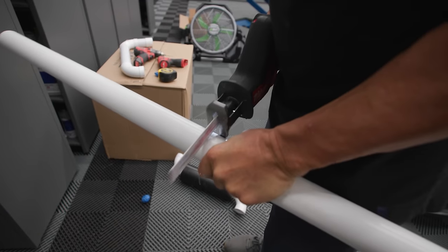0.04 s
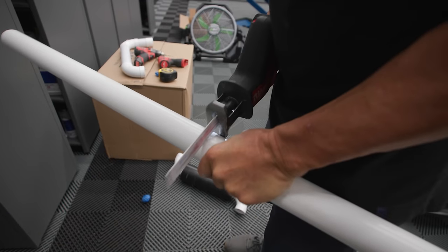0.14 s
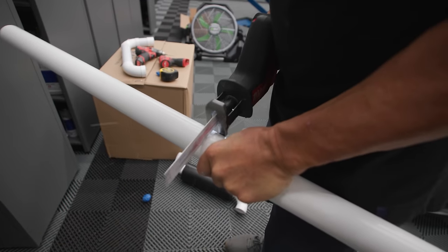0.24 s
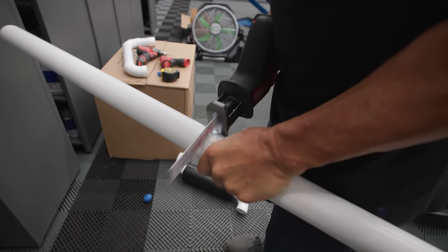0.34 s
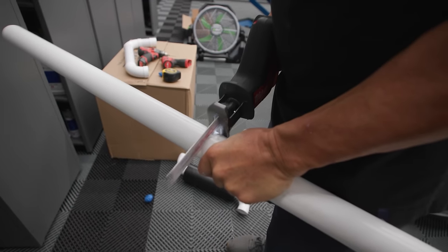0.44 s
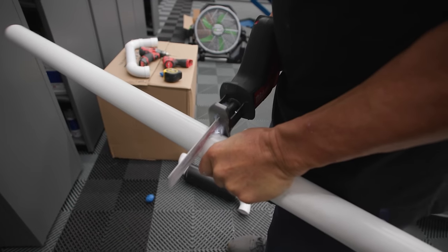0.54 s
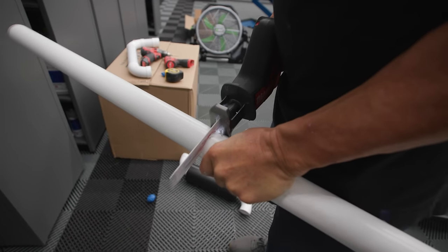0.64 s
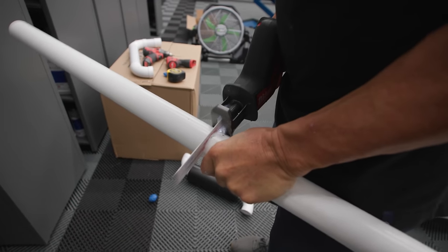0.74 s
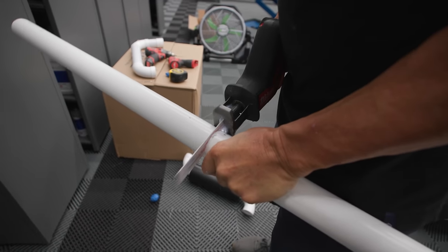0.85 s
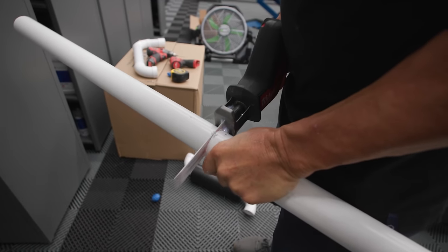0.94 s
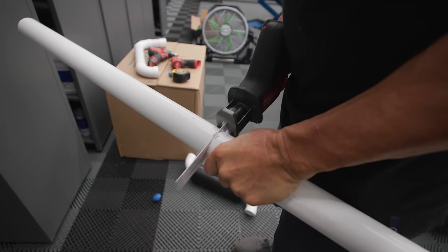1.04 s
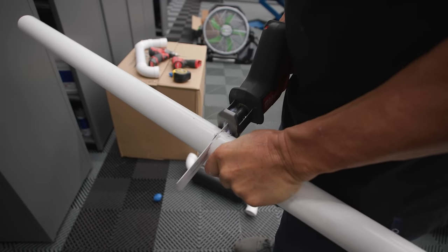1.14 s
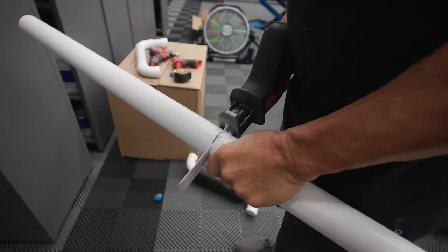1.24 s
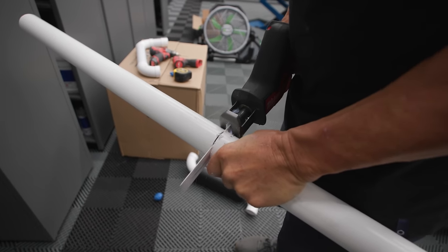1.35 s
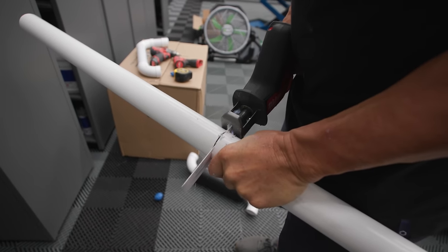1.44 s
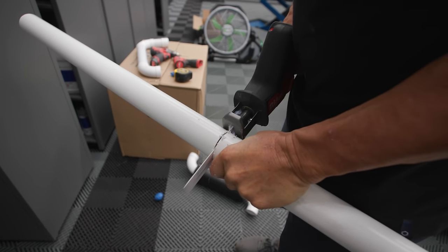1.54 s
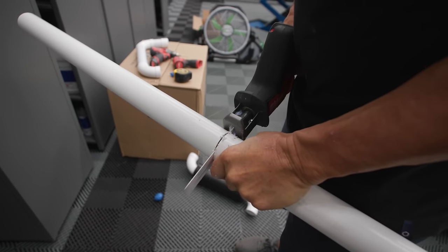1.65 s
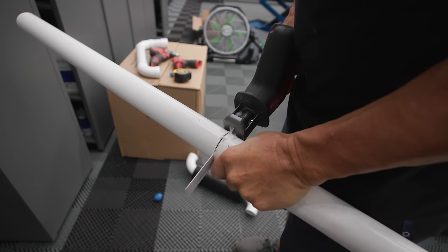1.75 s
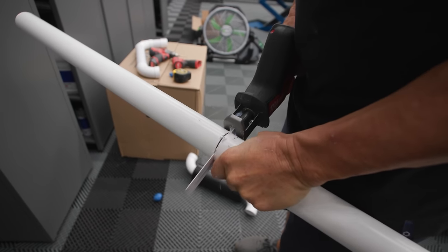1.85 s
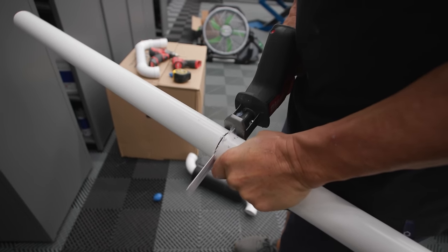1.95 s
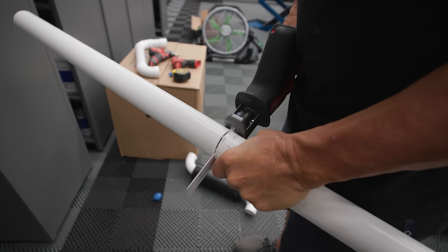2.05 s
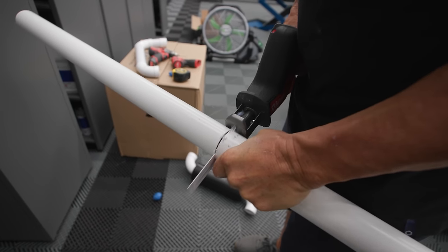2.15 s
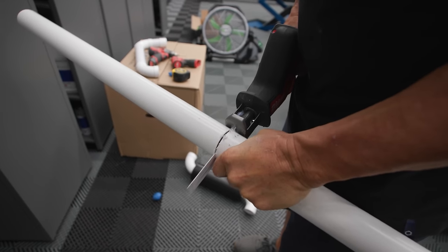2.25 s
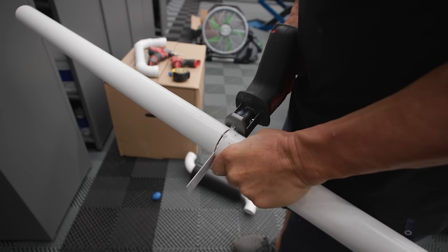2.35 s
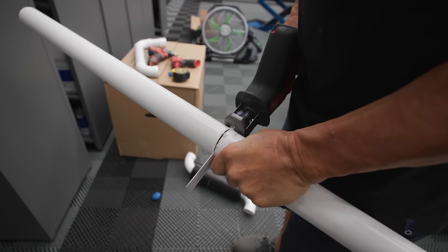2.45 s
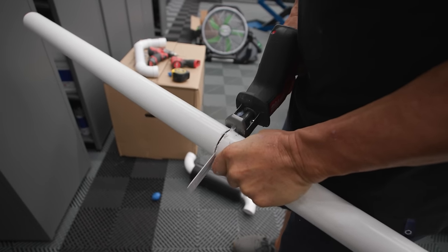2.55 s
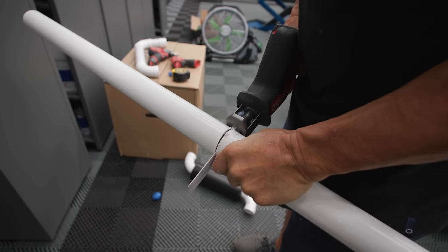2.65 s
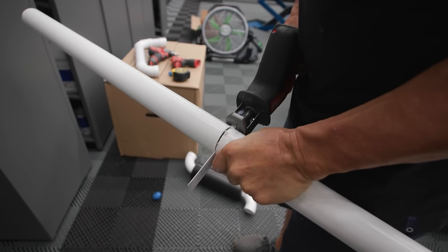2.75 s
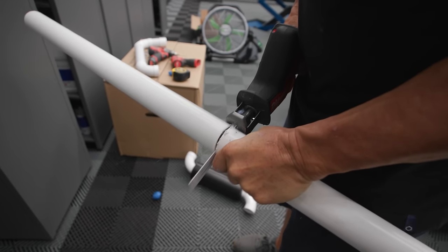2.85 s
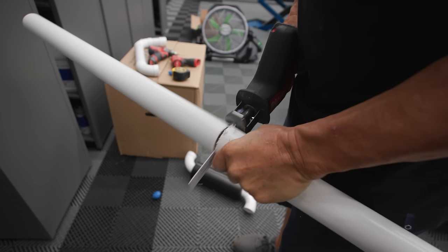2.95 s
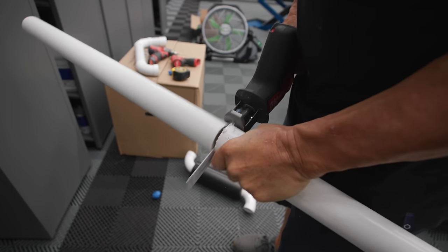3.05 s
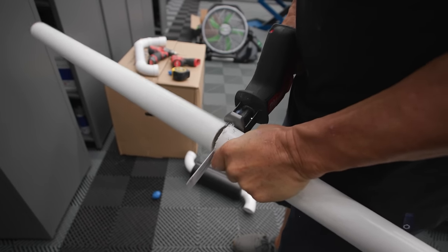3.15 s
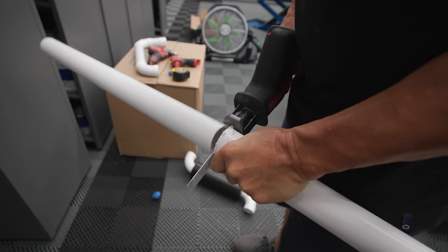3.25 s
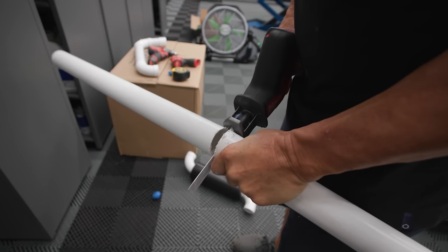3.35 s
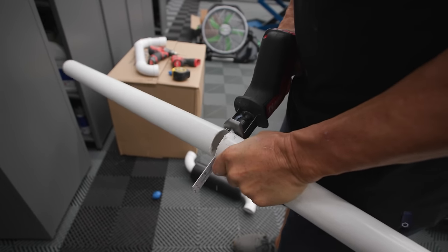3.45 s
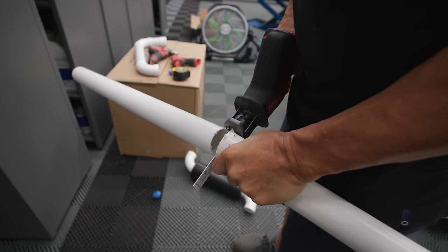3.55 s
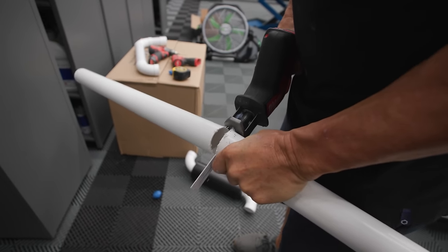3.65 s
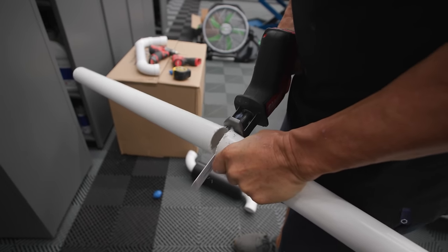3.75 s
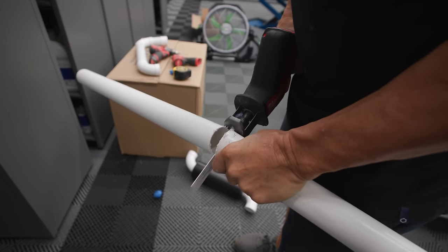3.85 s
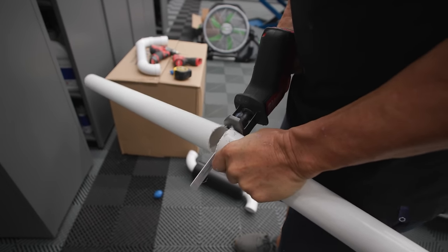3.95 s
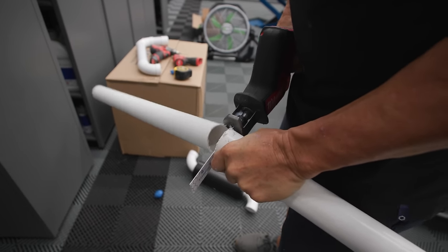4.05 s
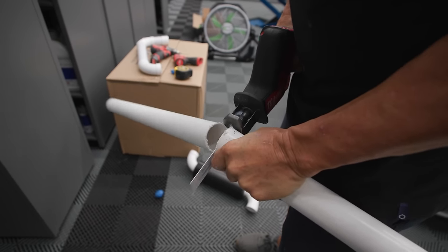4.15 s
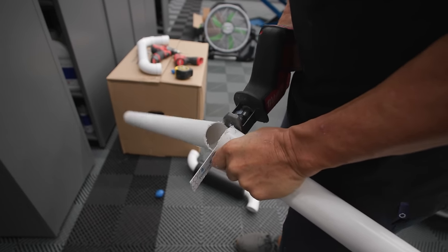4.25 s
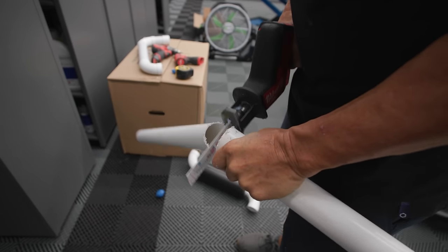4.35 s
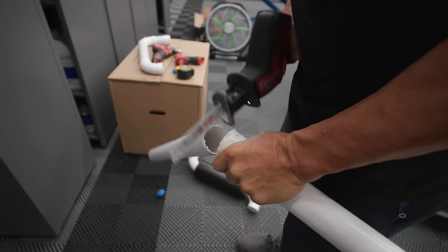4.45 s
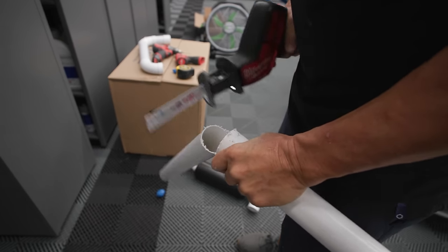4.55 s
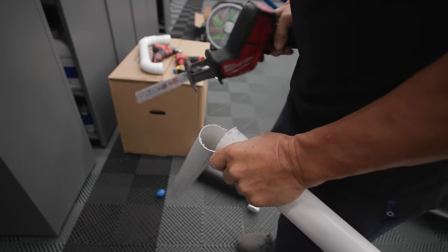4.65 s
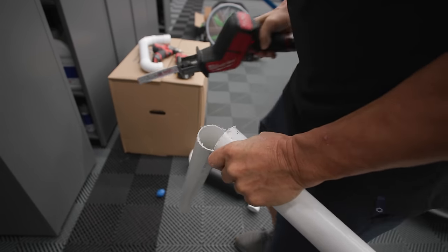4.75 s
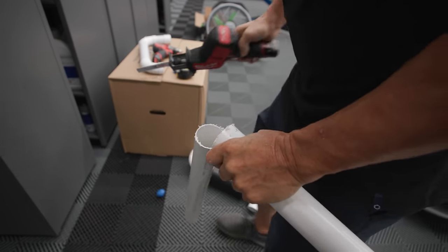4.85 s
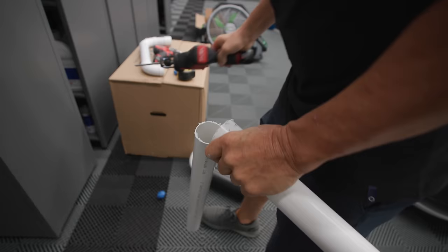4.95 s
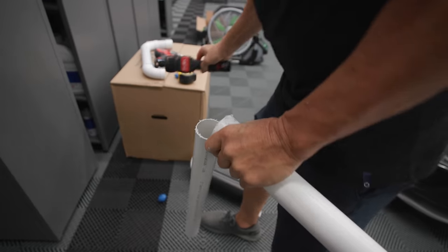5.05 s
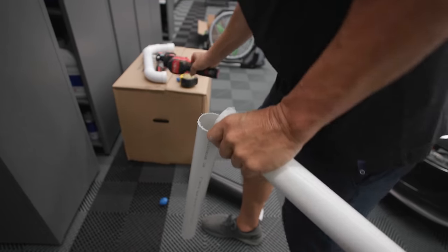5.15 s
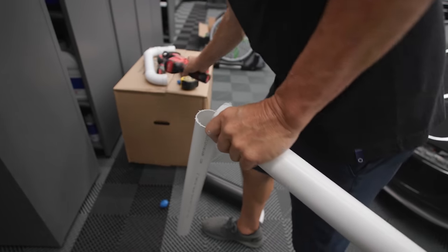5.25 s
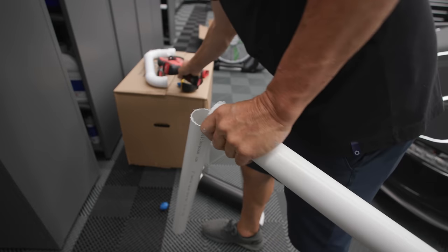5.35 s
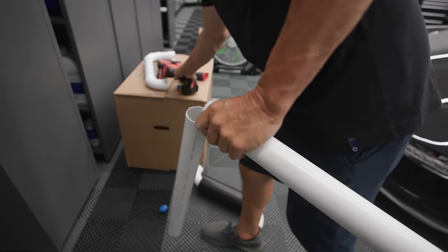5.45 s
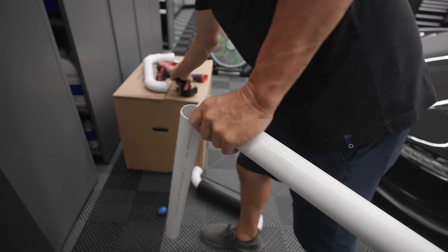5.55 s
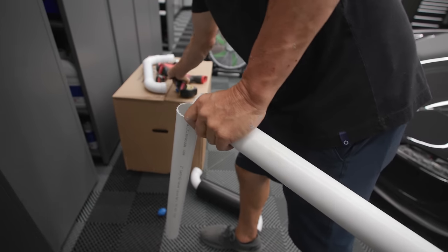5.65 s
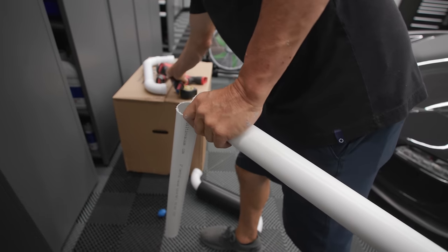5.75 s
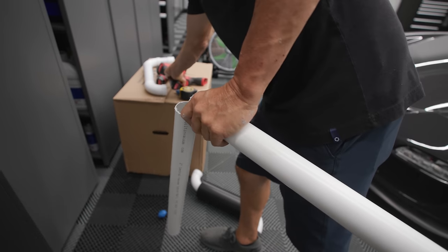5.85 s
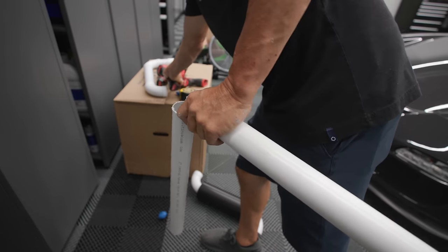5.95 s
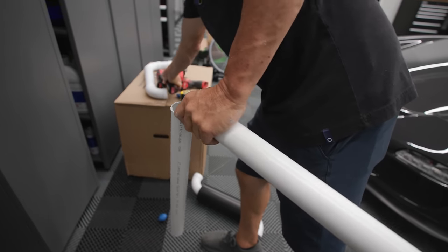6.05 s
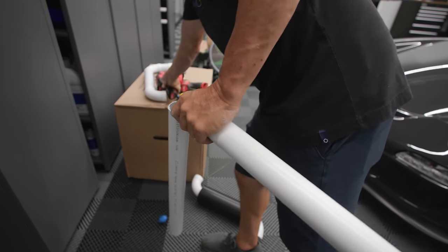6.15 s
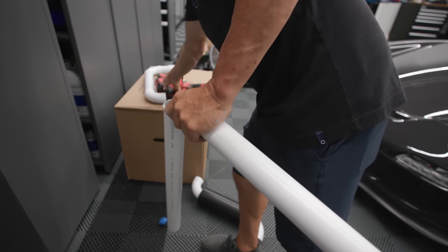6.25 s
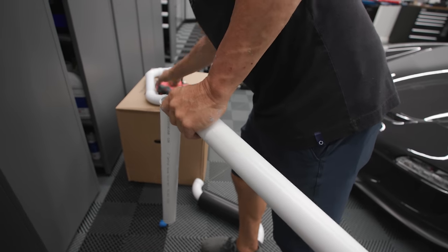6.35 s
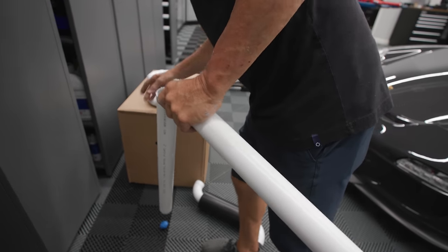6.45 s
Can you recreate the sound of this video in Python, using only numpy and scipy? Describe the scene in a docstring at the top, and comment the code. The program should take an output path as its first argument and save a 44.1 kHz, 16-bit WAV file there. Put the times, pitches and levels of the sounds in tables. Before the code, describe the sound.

Harsh buzzing saw strokes chew through a plastic pipe, stutter three times and stop; cloth rustles and the tool thumps hollowly onto cardboard.

```python
"""A cordless reciprocating saw cuts a plastic pipe in a garage: one long cut, then three short bursts.
Noise stands for the scraping teeth; a force curve repeated at each stroke shapes it, and filters colour it.
Damped sinusoids at each stroke are pipe wall, blade squeak and brief whine; crank harmonics shake the tool.
Then the cut-off pipe end knocks on the floor, clothes rustle (filtered noise) and the saw is set down on a
cardboard box: modal thuds with noise clacks and ticks. A diffuse tail and quiet coloured air surround it."""
import sys
import numpy as np
from scipy import signal
from scipy.fft import rfft, irfft
from scipy.io import wavfile
from scipy.ndimage import uniform_filter1d

SR = 44100
rng = np.random.default_rng(int(sys.argv[2]) if len(sys.argv) > 2 else 0)


def transcribe(u):
    """Save the signal u as a 16-bit wav file named by the first command-line argument.

    u: samples, shape (n,) or (channels, n), limited to [-1, 1]; the rate is SR.
    q: integer samples, one column per channel.
    """
    v = np.clip(np.atleast_2d(u).T, -1, 1)
    q = np.round(v * 32767).astype(np.int16)
    wavfile.write(sys.argv[1], SR, q)


N = 286209
T = np.arange(N) / SR  # time axis, s

# Colour of the quiet air: [f/Hz, relative density/dB per Hz]
AIR_SPECTRUM = [(15, -11), (25, -15), (38, -1), (60, -16), (88, -3.5), (200, -16), (290, -17.5), (400, -13),
                (750, -16), (1200, -22), (3300, -25), (4000, -19.5), (4700, -29.5), (15500, -40.5)]
AIR_DB = -53
# Decay of the garage's diffuse tail: [f/Hz, t60/s]
GARAGE_DECAY = [(100, 1), (500, 0.36), (2000, 0.82), (4000, 0.53), (8000, 0.59), (14000, 0.37)]
SAW_TO_GARAGE_DB, KNOCKS_TO_GARAGE_DB = -10.0, -9.5

# Colour of rubbing cloth: [f/Hz, relative density/dB per Hz]
CLOTH_SPECTRUM = [(150, 1.5), (320, 0.5), (550, 3), (950, -3.5), (1500, -5), (2300, -6.5), (2900, -11.5),
                  (4800, -11), (6000, -15.5), (8500, -19), (10500, -18.5), (13000, -24), (15000, -29)]
# Body movements that rustle the clothes: [start t/s, length/s, level/dB]
RUSTLES = [(5.02, 0.39, -51), (5.34, 0.24, -48), (5.6, 0.97, -54.5), (6.2, 0.77, -51)]

# Knocks of pipe and saw: [t/s, thud level/dB, thud pitch (factor on the box),
# thud length (factor on the box), clack level/dB, tick level/dB]
KNOCKS = [(4.777, -42, 0.7, 1, -55, -53), (5.014, -52, 0.77, 1, -36.5, -58), (5.02, -56, 1, 1, -41, -59),
          (5.612, -32, 0.6, 1, -44, -60), (5.6194, -40, 1.04, 1, -42, -28.5),
          (5.623, -24, 0.67, 1.04, -50, -50), (5.927, -29, 0.88, 0.93, -50, -50),
          (5.946, -27, 0.75, 1, -54, -51), (6.1885, -12, 1.0, 1.12, -15.5, -21),
          (6.1906, -34, 1.4, .7, -22.5, -25), (6.213, -26, 1.1, 1, -38, -44),
          (6.2205, -37, 1.7, 1, -42, -38), (6.243, -30, 1.2, 1, -43, -47),
          (6.3284, -14.5, 0.955, 0.53, -34.5, -54), (6.345, -36, 1.2, .7, -38, -52),
          (6.386, -25, 1.1, 1.05, -35.5, -35), (6.402, -33, 1.1, .7, -43, -45)]
# Modes of the cardboard box at pitch and length 1: [f/Hz, level/dB, t60/s]
BOX_MODES = [(92, -36, .1), (150, 2.5, 0.086), (170, -9, 0.037), (255, -3, 0.048), (453, -21, 0.2),
             (570, -13.5, 0.054)]
# Colours of the hard contact, clack and tick: [f/Hz, relative density/dB per Hz]
CLACK_SPECTRUM = [(40, -22), (150, -8), (400, -6), (700, 0.5), (980, 0.5), (1250, -5), (2000, -8.5),
                  (3000, -14), (3900, -30), (4800, -13), (6500, -23.5), (14000, -36)]
TICK_SPECTRUM = [(60, -20), (500, -2), (2000, -7.5), (3100, 4), (4500, -0.5), (6500, -13.5), (8400, -26),
                 (11000, -23), (15000, -26)]
# Modes of the cut-off pipe end, which knocks once on the floor: [f/Hz, level/dB, t60/s]
PIPE_END_MODES = [(576, 0, 0.14), (670, -7, .12), (853, -7, .16), (1023, 0, .15), (1140, -2, .1),
                  (1529, -9, .05)]
PIPE_DROP_S, PIPE_DROP_DB = 5.0145, -46
# Modes of a small metal clink as the saw settles: [f/Hz, level/dB, t60/s]
CLINK_MODES = [(2780, 0, 0.025), (3240, -2, .025), (3350, -3, .03), (8200, -6, .018), (8550, -10, .015)]
CLINK_S, CLINK_DB = 6.3858, -31.5
# The box drums as the saw slides on it: [start t/s, length/s, level/dB]
SLIDES = [(5.68, 0.097, -47.5), (6.2, 0.14, -47), (6.36, 0.25, -41)]

# Trigger pulls that finish the cut: [start t/s, stop t/s, rasp level/dB]
BURSTS = [(3.71, 3.898, -24), (3.966, 4.15, -24.5), (4.213, 4.365, -29)]
CUT_STOP_S = 3.535
SPIN_UP_S, BRAKE_S = 0.044, 0.012  # time constants of the level's rise and fall

# Colour of the pipe shaken in the hand: [f/Hz, relative density/dB per Hz]
JUDDER_SPECTRUM = [(25, -32), (55, -8), (85, -3), (120, -1.5), (170, -8.5), (280, -3.5), (350, -1.5),
                   (450, -4), (900, -52)]
# Pipe rumble during the long cut: [t/s, level/dB]
RUMBLE = [(0, -43), (.09, -39), (.2, -50), (.7, -60), (1.2, -81), (2.2, -60), (2.82, -50.5), (2.97, -39.5),
          (3.2, -44), (3.55, -53)]
BURST_JUDDER_DB = -21  # over the rasp of a burst

# Crank speed: [t/s, stroke rate/Hz]
SPEED = [(0.0, 36.66), (0.3, 37.0), (0.5, 37.85), (0.65, 38.06), (0.85, 37.61), (1.1, 38.84), (1.4, 39.21),
         (1.75, 40.36), (2.05, 39.46), (2.35, 39.45), (2.6, 41.2), (2.9, 39.95), (3.2, 38.42), (3.55, 39.7)]
# Shaking of the tool: [t/s, mean level/dB at 1, 2, 3, 4 and 5 times the stroke rate]
SHAKE = [(0.0, -55, -50, -56, -54, -46), (0.18, -60, -53, -38, -46, -42), (0.4, -64, -53, -42.5, -49, -45),
         (0.62, -67, -60, -49, -52, -48), (0.95, -65, -67, -52, -55, -61), (1.25, -59, -60, -53, -57, -59),
         (1.45, -55, -53, -51, -68, -59), (1.7, -55, -57, -51, -66, -61), (1.87, -62, -62, -44.5, -61, -63),
         (2.15, -69, -52, -49, -60, -54), (2.4, -51, -52, -47, -53, -61), (2.75, -46, -47, -44.5, -56, -60),
         (3.05, -46, -50, -48, -56, -49), (3.25, -48, -48, -44.5, -56, -62),
         (3.55, -55, -55, -56, -58, -62)]
# Higher harmonics of the crank: [multiple of the stroke rate, mean level/dB]
OVERTONES = [(6, -62), (7, -59), (8, -69)]
# motor whine and speed control's singing at each restart: level, time to peak
WHINE_DB, WHINE_S, SING_DB, SING_S = -34, .045, -52, .055

# Ringing at each stroke: pipe wall resonances, a blade squeak near 1650 Hz on the return stroke and a
# brief motor whine at 3780 Hz: [start t/s, end t/s, f/Hz at start, f/Hz at end,
# onset (share of the stroke), time to peak/s, level/dB against the rasp]
STROKE_RINGS = [(0.04, 0.52, 1655, 1630, .26, .0042, -5), (0.92, 1.4, 2030, 2005, .68, .005, -8),
                (0.9, 1.95, 1190, 1195, .66, .005, -13.5), (1.8, 2.3, 1205, 1195, .66, .005, -8.5),
                (2.25, 2.72, 1205, 1200, .66, .006, -9.5), (0.6, 1.7, 2460, 2420, .68, .0036, -8.5),
                (0.95, 1.52, 3540, 3560, .66, .003, -6.5), (1.5, 2.0, 3500, 3580, .65, .003, -8),
                (0.8, 2.0, 5420, 5270, .72, .003, -13), (0.47, 1.9, 4820, 4800, .66, .0024, -11.5),
                (0.25, 0.79, 860, 1040, .62, .005, -10.5), (0.1, 0.86, 505, 550, .7, .005, -14),
                (0.08, 0.5, 3080, 3100, .76, .003, -11), (0.0, 0.15, 3780, 3780, .3, .005, -8),
                (0.2, 0.75, 1980, 1750, .45, .004, -11), (1.9, 2.32, 2040, 1980, .68, .0035, -11),
                (1.75, 2.32, 2400, 2480, .68, .003, -10), (2.3, 3.3, 2380, 2300, .05, .004, -11.5),
                (0.75, 1.85, 925, 915, .75, .006, -20), (2.0, 3.55, 5200, 5180, .6, .0015, -15.5),
                (2.4, 3.2, 2950, 2850, .6, .003, -14), (2.4, 3.6, 480, 470, .55, .01, -17.5),
                (3.5, 4.4, 1530, 1600, .5, .0022, -9), (3.34, 4.4, 2820, 2880, .5, .0035, -9.5)]
RING_UNEVEN_DB, RING_DETUNE = 1.6, .008  # stroke-to-stroke spread of level and of pitch (share)
RING_JITTER_S, LOOSE_JITTER_S = .00013, .001  # spread of ring timing, pipe firm and loose

# Force on the teeth through one stroke, before the bite factor: [share of the stroke, level/dB]
STROKE = [(0, -1), (.1, .5), (.22, -2.5), (.42, -4.5), (.58, -8), (.66, 1.5), (.76, 5.5), (.88, 2.5)]
# How deeply the teeth bite: [t/s, factor on the stroke's dB shape]
BITE = [(.1, .5), (.42, .35), (.85, 1.1), (1.4, 1.05), (2.25, 0.65), (2.4, 0.1), (2.85, 0.16), (3.1, 0.55),
        (3.7, 0.3)]
CHATTER_DB, CHATTER_DB_PER_BITE = 2.5, -1.5  # a shallow bite lets the teeth skip
STROKE_UNEVEN_DB = .5  # spread of force between strokes
# until the teeth have made a groove they catch later (share of a stroke) and jolt harder (force factors)
GROOVE_S, GROOVE_TAKES_S = 0.49, 0.18
ENTRY_LAG, ENTRY_JOLT, JOLT = .14, 1.1, 0.25

# Long cut: [t/s, rasp level/dB, pipe body level/dB over the rasp, tooth fizz level/dB over the rasp]
CUT = [(0.0, -24, -4.5, -10), (0.09, -22.5, -7.5, -8), (0.66, -21.5, -7, -12), (0.96, -23, -11.5, -7),
       (1.29, -23, -14.5, -8), (1.71, -23.5, -8, -10.5), (1.83, -20, -13, -9), (1.9, -25, -13, -8.5),
       (2.0, -26.5, -9, -8), (2.78, -23.5, -6.5, -10.5), (2.91, -26, -3, -6.5), (3.0, -22, -4.5, -10),
       (3.28, -22.5, -7, -11.5), (3.3, -24.5, -2.5, -9.5), (3.52, -24.5, -6.5, -9.5),
       (3.53, -22.5, -4.5, -11.5)]
BURST_BODY_DB, BURST_FIZZ_DB = -6.5, -12  # over the rasp
# Colours of the cut, hollow body, rasp and fizz: [f/Hz, relative density/dB per Hz]
BODY_SPECTRUM = [(60, -35), (130, -19.5), (230, -20), (340, -14), (410, -7.5), (500, -0.5), (640, -0.5),
                 (800, -1), (920, -1), (1050, -4), (1200, -0.5), (1380, -4.5), (1600, -4.5), (2200, -49)]
RASP_SPECTRUM = [(800, -39.5), (1250, -9), (1520, -3), (2000, -0.5), (2400, -1.5), (3100, -1), (3550, -0.5),
                 (4000, -3), (4400, -5.5), (4750, -5.5), (5250, -3.5), (5600, -12.5), (6200, -18.5),
                 (8000, -58)]
FIZZ_SPECTRUM = [(4500, -29), (5900, 1.5), (6500, -0.5), (7200, 0.5), (8500, -1), (10000, -4),
                 (11500, -8.5), (13600, -14), (14400, -17), (15000, -88)]
# Gain of the highest treble in the fizz: [t/s, level/dB]
FIZZ_TOP = [(0.1, -5.5), (0.75, -4.5), (1.2, 0.5), (2.2, -0.5), (2.55, 6), (3.0, 1), (3.8, 3.5)]
FIZZ_TOP_HZ = 9400
FIZZ_POWER, BODY_POWER = 0.87, 0.67  # exponents on the force
# Teeth snag on the slot's edge: [t/s, level/dB]
SNAGS = [(0.075, -12), (0.187, -17), (0.634, -18), (0.74, -13), (.847, -15), (0.927, -15), (1.058, -18),
         (1.16, -15), (1.417, -24), (1.441, -19), (1.844, -20), (2.145, -17), (3.544, -16), (3.815, -13),
         (3.946, -30), (4.06, -19), (4.087, -15), (4.362, -24)]
SNAG_FIZZ_DB = -8  # over the snag's rasp
CHIPS_PER_S, CHIP_SHARE = 260, .15  # mean rate; share of the noise power that drives rasp and fizz
# repeating share of the scrape's power, pipe firm; its likeness from one stroke to the next (0-1)
RASP_REGULAR, BODY_REGULAR, LIKENESS = .45, .56, .75
LOOSE_S, LOOSE_TAKES_S = 2.5, .6  # the pipe shifts about and the strokes stop repeating
# Relative modes of the free steel blade: [f/Hz, level/dB, t60/s]
BLADE_MODES = [(2790, -6, .4), (3660, -4, .4), (3712, -2, .6), (3774, 1, .85), (3815, -2, .85),
               (3870, -5, .7)]
BLADE_HELD_DB, BLADE_FREE_DB = -23, -17  # against the rasp, held in the slot and free
GAPE_S, GAPE_TAKES_S = 3.3, 0.26  # the slot gapes and the blade rings freely

CEILING, EDGE_HZ = .45, 15600  # peak amplitude and band edge of the output


def amp(db):
    """Level definition: decibels to amplitude ratio."""
    return 10 ** (np.asarray(db) / 20)


def unit(x):
    """Normalisation to rms 1."""
    return x / np.sqrt(np.mean(x ** 2) + 1e-20)


def noise():
    """White noise: equal mean power in every band."""
    return rng.standard_normal(N)


def curves(rows):
    """Linear interpolation of each column against time."""
    s, *columns = np.transpose(rows)
    return [np.interp(T, s, c) for c in columns]


def read(points, hz):
    """Interpolation on a logarithmic frequency axis."""
    f, value = np.transpose(points)
    return np.interp(np.log(hz + 1), np.log(f + 1), value)


def add(mix, s, sound):
    """Superposition: adds a sound at time s, in place."""
    part = mix[max(round(s * SR), 0):][:len(sound)]
    part += sound[:len(part)]


def ramp(start_s, length_s):
    """Linear transition from 0 to 1."""
    return np.clip((T - start_s) / length_s, 0, 1)


def swells(rows):
    """Envelope of separate movements, each one rounded arch."""
    return sum(amp(db) * abs(np.sin(np.pi * ramp(s, length))) ** .5 for s, length, db in rows)


def wobble(rate_hz):
    """Low-pass noise: a smooth random fluctuation of rms 1."""
    low_pass = signal.butter(2, rate_hz, fs=SR, output="sos")
    return unit(signal.sosfilt(low_pass, noise()))


def colour(x, points, size=4096):
    """Minimum-phase filtering: the phase follows from the log gain by the Hilbert transform."""
    log_gain = np.log(amp(read(points, abs(np.fft.fftfreq(size, 1 / SR)))))
    taps = np.fft.ifft(np.exp(np.conj(signal.hilbert(log_gain)))).real[:size // 2]
    return signal.oaconvolve(x, taps / np.linalg.norm(taps))[:len(x)]


def resonate(x, hz, width):
    """Resonance by heterodyning: shift to zero frequency, smooth with a double pole, shift back."""
    turn = np.exp(2j * np.pi * np.cumsum(hz * np.ones(len(x))) / SR)
    r = np.exp(-np.pi * width * 1.5 / SR)
    return (turn * signal.lfilter([(1 - r) ** 2], [1, -2 * r, r * r], x / turn)).real


def ring(modes):
    """Modal superposition: a struck body sounds as exponentially decaying sinusoids."""
    t = T[:SR]
    return sum(amp(db - 60 * t / t60) * np.sin(2 * np.pi * hz * t) for hz, db, t60 in modes)


def burst(decay_s, size=4096):
    """Impulsive contact: a brief noise puff with a nearly flat spectrum."""
    fade = np.exp(-T[:size] / decay_s)
    z = rfft(rng.standard_normal(size) * fade)
    puff = irfft(z / (abs(z) + 1e-9) ** .75) * np.sqrt(fade)
    return unit(puff) * np.sqrt(np.mean(fade ** 2))


def quiet_air():
    """Stationary background noise with a falling spectrum."""
    return amp(AIR_DB) * unit(colour(noise(), AIR_SPECTRUM))


def garage(x):
    """Diffuse reverberation: convolution with noise whose bands each decay at their own t60."""
    hz, t, z = signal.stft(rng.standard_normal(SR), SR, nperseg=256)
    decay = amp(-60 * t / read(GARAGE_DECAY, hz)[:, None])
    tail = signal.istft(z * decay, SR, nperseg=256)[1][:SR]
    tail *= np.clip((T[:len(tail)] - .005) / 0.00084, 0, 1)  # silent for the first 5 ms
    return signal.oaconvolve(x, tail / np.linalg.norm(tail))[:N]


def clothes():
    """Friction noise: uneven rubbing of cloth while leaning over to the box."""
    rub = colour(noise() * amp(1.6 * wobble(70)), CLOTH_SPECTRUM)
    return swells(RUSTLES) * unit(rub)


def knocks():
    """Impact excitation: contacts clack, tick and thud; pipe end and metal ring; sliding drums the box."""
    out = np.zeros(N)
    for s, thud_db, pitch, length, clack_db, tick_db in KNOCKS:
        modes = [(hz * pitch, db, t60 * length) for hz, db, t60 in BOX_MODES]
        thud = -ring(modes) * (1 - np.exp(-T[:SR] / 0.0027))  # soft onset
        add(out, s + 0.0021, amp(thud_db) * thud)
        add(out, s, amp(clack_db) * colour(burst(0.0065), CLACK_SPECTRUM))
        add(out, s, amp(tick_db) * colour(burst(0.0042), TICK_SPECTRUM))
    pipe_end = ring(PIPE_END_MODES) * (1 - np.exp(-T[:SR] / 0.002))
    add(out, PIPE_DROP_S, amp(PIPE_DROP_DB) * pipe_end)
    add(out, CLINK_S, amp(CLINK_DB) * ring(CLINK_MODES))
    drumming = unit(resonate(noise(), 135, 83))
    return out + swells(SLIDES) * drumming


def brake(stop_s):
    """Exponential decay of the level once the trigger is let go."""
    return np.exp(-np.maximum(T - stop_s, 0) / BRAKE_S)


def bursts():
    """First-order response: the level of each short pull rises, holds and falls."""
    level = np.zeros(N)
    for start, stop, db in BURSTS:
        spin_up = 1 - np.exp(-np.maximum(T - start, 0) / SPIN_UP_S)
        level += amp(db) * spin_up * brake(stop)
    return level


def restarts(peak_s):
    """Transient envelope: a swell and fade after each new pull of the trigger."""
    ages = [np.maximum(T - start, 0) / peak_s for start, _, _ in BURSTS]
    return sum(age * np.exp(1 - age) for age in ages)


def judder():
    """Forced vibration: the pipe rumbles in the hand, most as the blade enters and the slot widens."""
    level = amp(curves(RUMBLE)[0]) * brake(CUT_STOP_S) + amp(BURST_JUDDER_DB) * bursts()
    return level * unit(colour(noise(), JUDDER_SPECTRUM))


def motor(turns):
    """Periodic forcing: the crank yields harmonics; at restarts motor and speed control sound."""
    orders = [(k + 1, db) for k, db in enumerate(curves(SHAKE))]
    orders += [(round(k), db + 3 * wobble(2)) for k, db in OVERTONES]
    shake = np.zeros(N)
    for k, db in orders:
        shake += amp(db + 1.5 * wobble(5)) * np.sin(2 * np.pi * (k * turns + rng.random()))
    whine = amp(WHINE_DB) * restarts(WHINE_S) * unit(resonate(noise(), 3750, 170))
    singing = amp(SING_DB) * restarts(SING_S) * unit(resonate(noise(), 10100, 90))
    return shake * brake(CUT_STOP_S) + whine + singing


def stroke_rings(turns):
    """Periodic excitation: damped pings at each stroke (wall, squeak, whine), and their relative power."""
    sound, power, t = np.zeros(N), np.zeros(N), T[:3000]
    strokes = np.arange(260)
    for start, end, from_hz, to_hz, place, peak_s, db in STROKE_RINGS:
        swell = amp(db) * np.sqrt(abs(np.sin(np.pi * ramp(start, end - start))))
        shape = (t / peak_s * np.exp(1 - t / peak_s)) ** 2
        pings = np.zeros(N)
        times = np.interp(strokes + place, turns, T)
        for s, (size, detune, slip) in zip(times, rng.standard_normal((len(strokes), 3))):
            if start < s < end:
                hz = np.interp(s, [start, end], [from_hz, to_hz]) * (1 + RING_DETUNE * detune)
                jitter_s = RING_JITTER_S if s < LOOSE_S else LOOSE_JITTER_S
                ping = shape * np.sin(2 * np.pi * hz * (t + jitter_s * slip))
                add(pings, s, amp(RING_UNEVEN_DB * size) * ping)
        # unit() averages over the whole time, so correct for the active stretch
        sound += swell * unit(pings) * np.sqrt((end - start) / T[-1])
        power += swell ** 2
    return sound, power


def teeth(turns):
    """Amplitude modulation by force: a jolt and a bite each stroke, no two alike, with quick catches."""
    bite, entering = curves(BITE)[0], 1 - ramp(GROOVE_S - GROOVE_TAKES_S, GROOVE_TAKES_S)
    chatter_db = CHATTER_DB + CHATTER_DB_PER_BITE * bite
    jolt = entering * ENTRY_JOLT + (1 - entering) * JOLT * np.sqrt(abs(bite))
    share = turns - ENTRY_LAG * entering
    stroke_db = np.interp(share % 1, *np.transpose(STROKE), period=1)
    uneven_db = STROKE_UNEVEN_DB * noise()[(turns + .5).astype(int)]  # one draw per stroke
    force = amp(bite * stroke_db + uneven_db + chatter_db * np.clip(wobble(170), -2, 2))
    force *= 1 + jolt * np.exp(-((share - .66) % 1) / .1)
    return force / np.sqrt(uniform_filter1d(force ** 2, size=4500))  # even rms over 0.1 s


def scraping(turns, regular):
    """Correlated noise: the same teeth pass the same edge, so part of each scrape is like the last."""
    stroke = np.floor(turns + .45).astype(int)
    age = np.arange(N) - np.searchsorted(stroke, stroke)  # samples since the stroke began
    fresh = rng.standard_normal((stroke[-1] + 1, age.max() + 1))
    alike = signal.lfilter([np.sqrt(1 - LIKENESS ** 2)], [1, -LIKENESS], fresh, axis=0)
    repeating = alike[stroke, age]
    return np.sqrt(regular) * repeating + np.sqrt(1 - regular) * noise()


def chips():
    """Random impulse train: sharp clicks as bits of plastic snap off."""
    snaps = rng.random(N) < CHIPS_PER_S / SR
    return unit(snaps * np.sign(noise()) * rng.uniform(0.59, 1, N))


def drifting(x, depth_db):
    """Time-varying filtering: the slot changes shape, so narrow bands swell and fade."""
    z = signal.stft(x, nperseg=512, noverlap=384)[2]
    patches = uniform_filter1d(rng.standard_normal(z.shape), size=2, axis=0)
    patches = uniform_filter1d(patches, size=28, axis=1)
    return signal.istft(z * amp(depth_db * unit(patches)), nperseg=512, noverlap=384)[1][:N]


def cutting(turns):
    """Frictional excitation: teeth rasp the plastic, and pipe and blade ring with the strokes."""
    rasp_db, body_db, fizz_db = curves(CUT)
    level = amp(rasp_db) * brake(CUT_STOP_S) + bursts()
    finishing = T > BURSTS[0][0]
    body_db = np.where(finishing, BURST_BODY_DB, body_db)
    fizz_db = np.where(finishing, BURST_FIZZ_DB, fizz_db)
    firm = 1 - ramp(LOOSE_S, LOOSE_TAKES_S)
    force, snaps = teeth(turns), np.sqrt(CHIP_SHARE) * chips()
    coarse = snaps + np.sqrt(1 - CHIP_SHARE) * scraping(turns, RASP_REGULAR * firm)
    fine = snaps + np.sqrt(1 - CHIP_SHARE) * noise()

    fizz = unit(colour(fine * force ** FIZZ_POWER, FIZZ_SPECTRUM))
    high_pass = signal.butter(4, FIZZ_TOP_HZ, "high", fs=SR, output="sos")
    top = signal.sosfiltfilt(high_pass, fizz)
    fizz = fizz + (amp(curves(FIZZ_TOP)[0]) - 1) * top

    rings, ring_power = stroke_rings(turns)
    # what goes into ringing is taken from the broad rasp
    share = 1 / np.sqrt(1 + ring_power)
    rasp = share * unit(colour(coarse * force, RASP_SPECTRUM)) + amp(fizz_db) * fizz
    rasp = drifting(rasp, depth_db=1.8)
    body = colour(scraping(turns, BODY_REGULAR * firm) * force ** BODY_POWER, BODY_SPECTRUM)
    sound = level * (rasp + share * rings + amp(body_db) * unit(body))

    for s, db in SNAGS:
        snag = colour(burst(0.0031), RASP_SPECTRUM)
        snag_fizz = colour(burst(0.00071), FIZZ_SPECTRUM)
        add(sound, s, amp(db) * (snag + amp(SNAG_FIZZ_DB) * snag_fizz))

    blade = ring(BLADE_MODES)
    blade_db = BLADE_HELD_DB + (BLADE_FREE_DB - BLADE_HELD_DB) * ramp(GAPE_S, GAPE_TAKES_S)
    drive = amp(blade_db) * level * force * noise()
    return sound + signal.oaconvolve(drive, blade / np.linalg.norm(blade))[:N]


def scene():
    """Superposition of direct sound, reverberation and background."""
    turns = np.cumsum(curves(SPEED)[0]) / SR  # strokes so far
    saw, handling = cutting(turns), knocks()
    echoing = garage(amp(SAW_TO_GARAGE_DB) * saw + amp(KNOCKS_TO_GARAGE_DB) * handling)
    return (saw + motor(turns) + judder() + handling + echoing + clothes() + quiet_air())[None]


def record(dry):
    """Soft saturation rounds the highest peaks; a linear-phase low-pass then limits the band."""
    rounded = dry / (1 + (dry / CEILING) ** 6) ** (1 / 6)
    low_pass = signal.firwin(511, EDGE_HZ, window=("kaiser", 9), fs=SR)
    return signal.oaconvolve(rounded, low_pass[None], "same")


dry = scene()
out = record(dry)
transcribe(out)
```